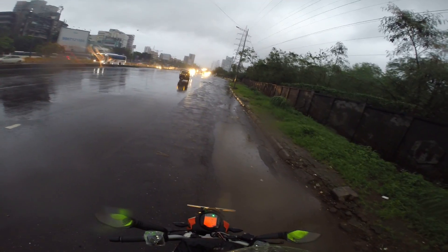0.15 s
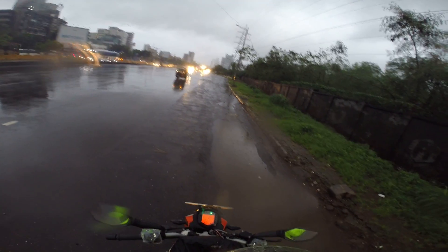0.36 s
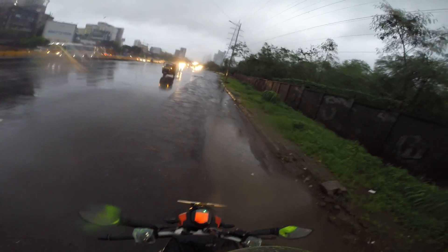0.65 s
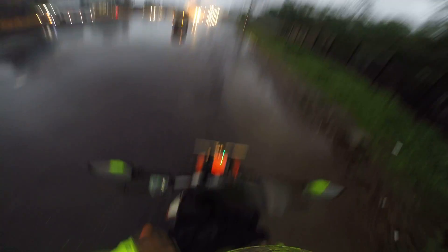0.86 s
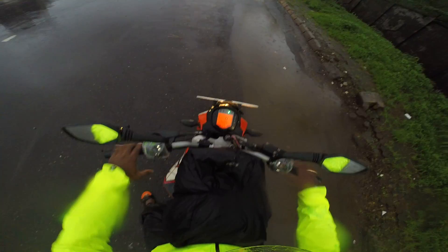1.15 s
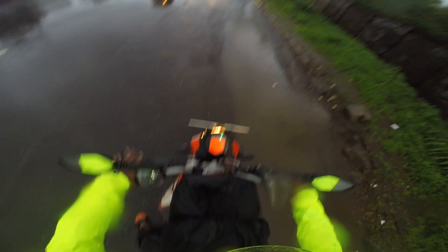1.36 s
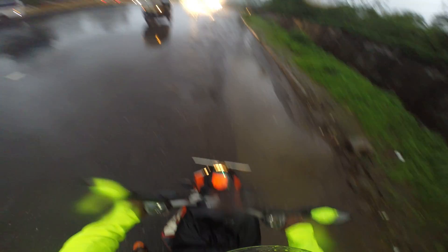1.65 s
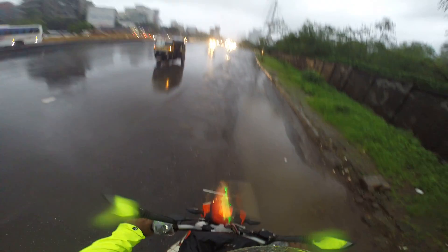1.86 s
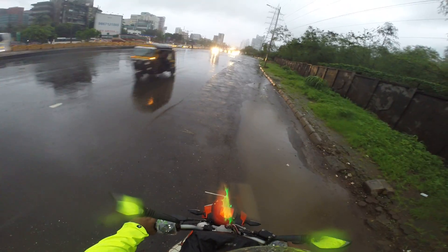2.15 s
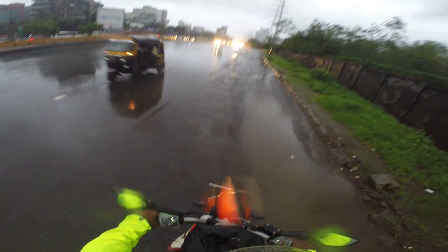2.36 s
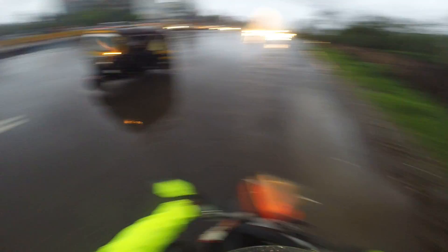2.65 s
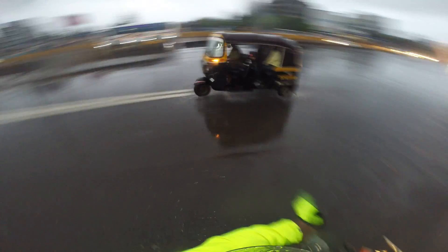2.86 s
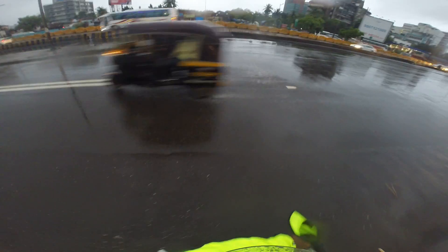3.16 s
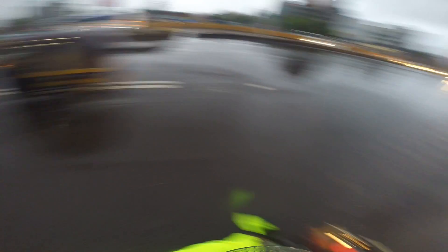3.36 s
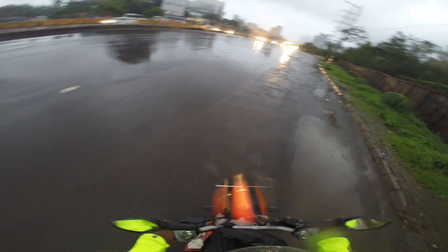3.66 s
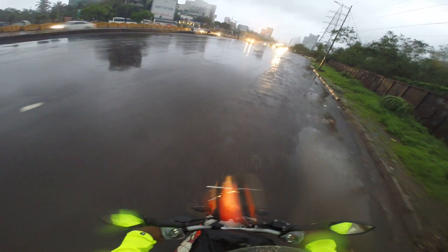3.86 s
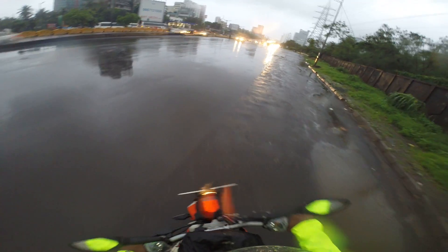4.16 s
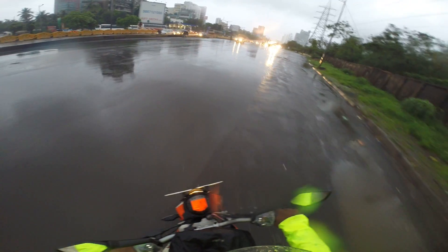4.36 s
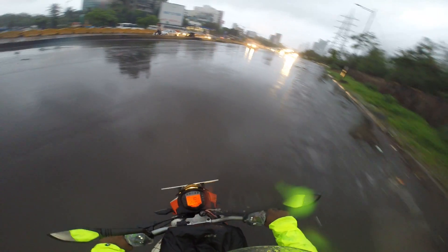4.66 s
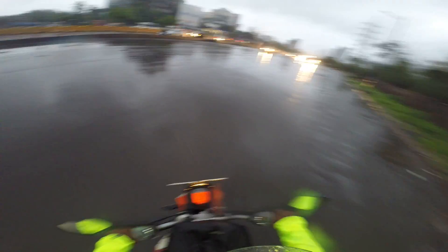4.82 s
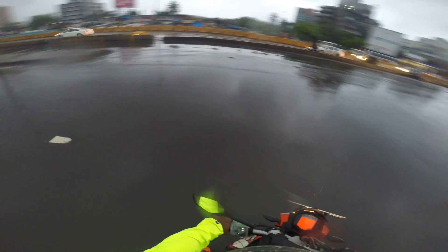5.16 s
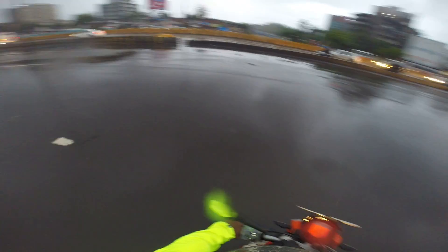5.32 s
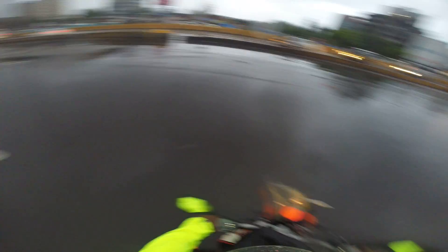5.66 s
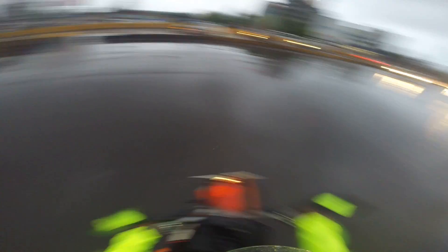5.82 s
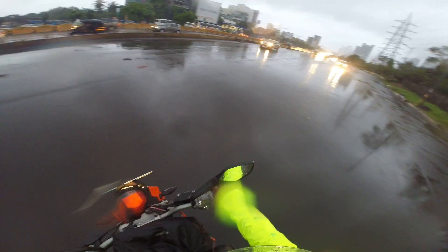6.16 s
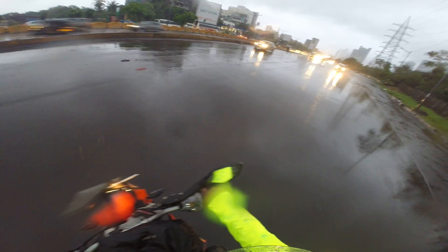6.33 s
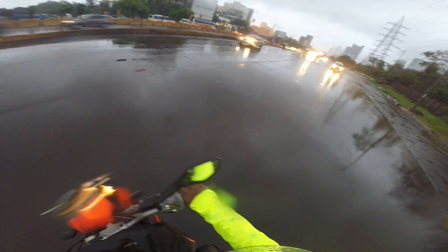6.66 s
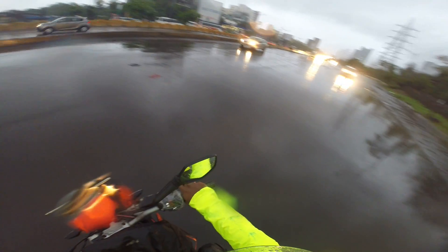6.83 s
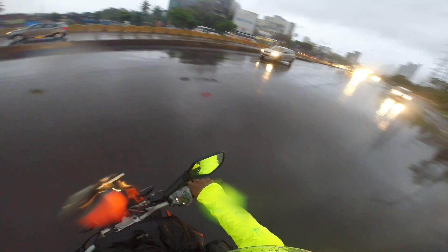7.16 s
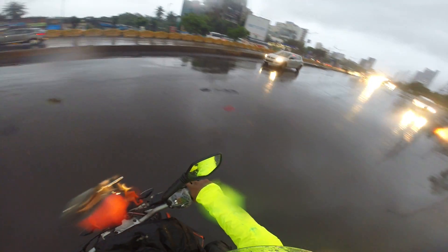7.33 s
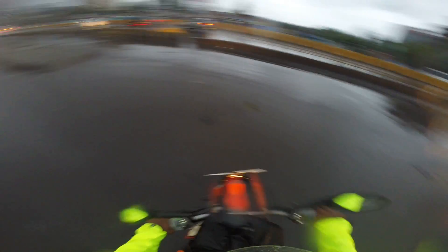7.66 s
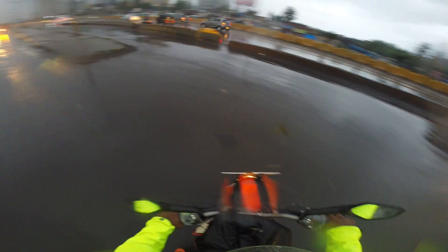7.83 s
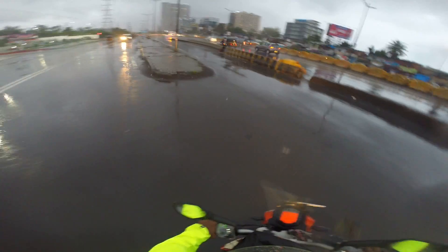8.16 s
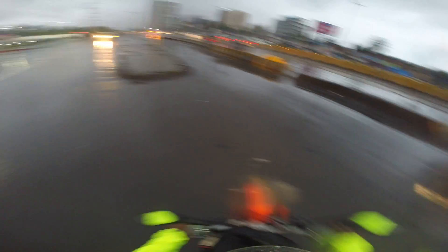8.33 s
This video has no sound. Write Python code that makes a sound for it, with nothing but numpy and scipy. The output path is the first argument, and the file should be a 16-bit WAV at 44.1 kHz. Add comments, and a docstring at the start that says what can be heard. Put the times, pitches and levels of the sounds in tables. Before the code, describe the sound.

A single-cylinder motorbike thuds and clatters along a wet road, jolting the camera mount early, as a three-wheeler hisses past and raindrops tick.

```python
"""A single-cylinder motorbike rides slowly along a wet road, heard from a cased camera on the rider's helmet.
Firing pulses thud through exhaust resonances, under crankcase clatter and tyre spray of shaped noise.
A three-wheeler hisses past as a swell of noise, and wavering sine tones squeak in two bursts.
A rough patch jolts the camera mount into damped swaying, knocking and creaking.
Low noise rumbles as wind on the case, and raindrops ring the case or pat the helmet."""
import sys
import numpy as np
from scipy import signal
from scipy.fft import rfft, irfft, next_fast_len
from scipy.io import wavfile

SR = 44100
rng = np.random.default_rng(int(sys.argv[2]) if len(sys.argv) > 2 else 0)


def put_to_file(sound):
    """Save the sound as 16-bit audio at rate SR, in the file named by the first command-line argument."""
    columns = np.atleast_2d(sound).T  # one column per channel
    safe = np.clip(columns, -1, 1)
    whole_steps = np.round(safe * 32767)
    wavfile.write(sys.argv[1], SR, whole_steps.astype(np.int16))


N = 374409
TIME = np.arange(N) / SR


def undb(db):
    """Decibels to amplitude gain."""
    return 10 ** (np.asarray(db) / 20)


def unit(x):
    """Normalise to an rms of 1."""
    return x / np.sqrt(np.mean(x ** 2))


def curve(table, column=1):
    """Linear interpolation: one column of a table, timed by its first, at every sample."""
    rows = np.array(table)
    return np.interp(TIME, rows[:, 0], rows[:, column])


def held(start_s, end_s, ramp_s):
    """Trapezoidal envelope: rises from 0 to 1 around the start, holds, and falls around the end."""
    nearest_edge_s = np.minimum(TIME - start_s, end_s - TIME)
    return np.clip(nearest_edge_s / ramp_s + .5, 0, 1)


def colour(x, points):
    """Spectral shaping: filter by (Hz, dB) points joined along log frequency; rms 1."""
    hz, db = np.transpose(points)
    size = next_fast_len(N)
    bins_hz = np.maximum(np.fft.rfftfreq(size, 1 / SR), 1)
    gain = undb(np.interp(np.log(bins_hz), np.log(hz), db))
    return unit(irfft(rfft(x, size) * gain, size)[:N])


def ring(modes, length_s):
    """Modal superposition: impulse response of damped resonances (Hz, width Hz, dB)."""
    t = np.arange(int(length_s * SR)) / SR
    response = np.zeros(len(t))
    for hz, width_hz, db in modes:
        decay = np.exp(-np.pi * width_hz * t)
        # scaling by width makes the dB set the height of the resonance peak
        response += undb(db) * width_hz * decay * np.sin(2 * np.pi * hz * t)
    return response


def resonate(x, modes):
    """Convolution: a sound drives damped resonances; rms 1."""
    return unit(signal.fftconvolve(x, ring(modes, .1))[:N])


def walk(rate_hz):
    """Slow modulation: random wandering through new values at a steady rate, with a spread near 1."""
    knots = rng.standard_normal(4096)
    return 1.2 * np.interp(TIME * rate_hz, np.arange(len(knots)), knots)


def patter(rate_hz, spread_db):
    """Shot noise: random tiny impacts, a few bigger than the rest; rms 1."""
    hit = rng.random(N) < rate_hz / SR
    sign = rng.choice([-1, 1], N)
    size_db = spread_db * np.minimum(rng.exponential(size=N), 4)
    return unit(hit * sign * undb(size_db))


def add(out, s, sound):
    """Linear superposition: mix a sound in from a given time."""
    start = max(int(s * SR), 0)
    out[start:start + len(sound)] += sound[:N - start]


# engine speed: time_s, firing_rate_hz
FIRING_RATE = [(0, 24), (2.4, 21), (2.6, 22.5), (2.92, 23.9), (3.5, 29.5), (3.72, 28.9), (4.03, 32.4),
               (4.47, 26.3), (4.7, 27), (4.95, 30.5), (5.2, 26.3), (6.45, 22.9), (6.78, 27), (7.28, 24.1),
               (7.48, 28.4), (7.7, 29.8), (8, 29.7), (8.3, 31)]
# pulls on the throttle: opens_s, closes_s, exhaust_over_idle_db
THROTTLE_PULLS = [(2.558, 3.927, 6.5), (3.917, 4.415, 3), (4.428, 5.0, 6.5), (5.82, 5.98, 4),
                  (6.422, 8.6, 5.5)]
# engine clatter: time_s, relative_level_db
CLATTER_LEVEL = [(1.0, -51), (1.29, -51), (2.08, -47.5), (2.31, -50), (2.71, -45.5), (3.25, -49.5),
                 (3.9, -46), (4.23, -48.5), (4.88, -49.5), (5.17, -53.5), (5.75, -52.5), (6.28, -48),
                 (6.84, -51), (8.49, -50)]
# exhaust resonances of one silencer chamber: pitch_hz, width_hz, peak_db
EXHAUST_MODES = [(59, 16, -6), (164, 50, 0), (285, 60, -14), (365, 80, -8), (425, 60, -10)]
# crankcase resonances: pitch_hz, width_hz, peak_db
CRANKCASE_MODES = [(1450, 220, -24.5), (1738, 114, -9), (1843, 130, -13.5), (2220, 240, -14.5),
                   (2530, 180, -17), (2700, 84, -19)]


def engine(idle_db=-59.0, uneven_db=0.8, ramp_s=0.071, clatter_db=1, tick_share=0.16, tick_length=0.18):
    """Pulse excitation: firings thump the exhaust; valve gear and piston rattle the case twice per firing."""
    cycles = np.cumsum(curve(FIRING_RATE)) / SR
    strength = undb(.8 * rng.standard_normal(N))
    firings = np.diff(np.floor(cycles), prepend=0) * strength
    # two silencer chambers in a row keep only the low thud
    exhaust = resonate(resonate(firings, EXHAUST_MODES), EXHAUST_MODES)
    exhaust = colour(exhaust, [(20, -12), (50, 0), (450, 0), (1000, -4), (3000, -30)])
    # an open throttle makes each thump harder
    load_db = sum(db * held(opens_s, closes_s, ramp_s) for opens_s, closes_s, db in THROTTLE_PULLS)
    exhaust_db = idle_db + load_db + uneven_db * walk(7)

    ticks = np.exp(-(2 * cycles % 1) / tick_length)  # length in half firing periods
    friction = rng.standard_normal(N) * (1 - tick_share + 2 * tick_share * ticks)
    rattle = resonate(friction, CRANKCASE_MODES)
    # a small stiff casing radiates little bass
    rattle = colour(rattle, [(100, -45), (700, -20), (1150, -14), (1400, 0), (3000, 0), (4500, -12)])
    rattle_db = curve(CLATTER_LEVEL) + clatter_db + .5 * walk(10)
    return exhaust * undb(exhaust_db) + rattle * undb(rattle_db)


# tyre spray, one list along the kerb and one across the road: time_s, relative_level_db
SPRAY_FLOW = [
    [(0.0, -53.5), (0.936, -55.5), (1.112, -52), (1.8, -51.5)],
    [(3.9, -51.5), (5.06, -52.5), (6.44, -50.5), (7.93, -47), (8.17, -48), (8.49, -48)],
]
# spectrum of the coarse droplets: frequency_hz, density_db
HISS_COLOUR = [(100, 4), (700, -2), (1100, -3), (2200, -3), (2850, 3.5), (3500, -2), (4100, 1), (4700, -3),
               (5600, 1.5), (7000, -3), (7480, 0.5), (8300, -14.5), (10000, -20), (15000, -37)]
# spectrum of the fine droplets: frequency_hz, density_db
FINE_MIST_COLOUR = [(4000, -28), (6500, 2), (8400, -3), (8900, -1.5), (9700, -8.5), (10600, -5.5),
                    (11100, -9), (11800, -7.5), (13000, -14.5), (15500, -25)]


def spray(hiss_db=-48, mist_db=-60, mist_growth=1.3, flutter_db=0.95):
    """Broadband droplet noise: the fine mist grows faster with the flow than the coarse hiss."""
    flow_db = curve(np.concatenate(SPRAY_FLOW))
    flow_db = flow_db - flow_db.mean()
    hiss = colour(rng.standard_normal(N) + .5 * patter(6000, 0.72), HISS_COLOUR)
    mist = colour(rng.standard_normal(N) + .5 * patter(2800, 2), FINE_MIST_COLOUR)
    droplets = hiss * undb(hiss_db + flow_db) + mist * undb(mist_db + mist_growth * flow_db)
    return droplets * undb(flutter_db * walk(14))


# the three-wheeler is alongside at this time, at this distance and relative speed
PASS_S, PASS_GAP_M, PASS_SPEED_M_S = 2.96, 3.9, 8.2
# the rider turns to look at it
LOOK_FROM_S, LOOK_UNTIL_S, HEAD_TURN_S = 2.81, 3.45, .16
# spectrum while the rider faces it: frequency_hz, density_db
FACING_COLOUR = [(200, -38), (1000, -11), (2000, -8), (2800, 1), (3500, -2.5), (4400, 2.5), (4900, -1.5),
                 (5500, 4), (6500, -1), (7300, -12), (8200, -12), (9200, -17), (14000, -31)]
# spectrum while the rider looks ahead: frequency_hz, density_db
LOOKING_AHEAD_COLOUR = [(200, -40), (1000, -12), (2000, -8), (2800, -6), (3400, -5), (3900, 5), (4350, 2),
                        (4800, -7.5), (5600, 3.5), (6200, -19), (7600, -5), (9000, -23.5), (14000, -26.5)]


def three_wheeler(passing_db=-42.0, beam=1.06, shadow_db_per_s=30):
    """Distance law and directivity: spray peaks alongside, changes colour as the head turns, then fades."""
    distance_m = np.hypot(PASS_GAP_M, PASS_SPEED_M_S * (TIME - PASS_S))
    closeness = PASS_GAP_M / distance_m
    facing = held(LOOK_FROM_S, LOOK_UNTIL_S, HEAD_TURN_S)
    noise = rng.standard_normal(N)
    wash = (1 - facing) * colour(noise, LOOKING_AHEAD_COLOUR) + facing * colour(noise, FACING_COLOUR)
    # the helmet shadows the sound once it is behind
    behind_s = np.maximum(TIME - LOOK_UNTIL_S, 0)
    # the wheels throw their spray sideways, so it falls off faster than with distance alone
    return wash * closeness ** (1 + beam) * undb(passing_db - shadow_db_per_s * behind_s)


# squeaks: start_s, length_s, start_pitch_hz, end_pitch_hz, level_db
SQUEAK_GLIDES = [(5.36, 0.087, 4115, 4045, -47.5), (5.363, 0.14, 3345, 3250, -52),
                 (5.505, 0.18, 4070, 4030, -55.5), (5.512, 0.1, 3320, 3325, -47.5)]


def squeaks(waver=0.0024, rough_db=2):
    """Frequency modulation: thin wavering sine squeals, as of a wet brake."""
    out = np.zeros(N)
    for s, length_s, start_hz, end_hz, db in SQUEAK_GLIDES:
        n = int(length_s * SR)
        hz = np.linspace(start_hz, end_hz, n) * (1 + waver * walk(130)[:n])
        swell = signal.windows.tukey(n, .7) * undb(db + rough_db * walk(103)[:n])
        add(out, s, np.sqrt(2) * swell * np.sin(2 * np.pi * np.cumsum(hz) / SR))
    return out


# jolts of the camera mount: start_s, sway_peak_db, knock_peak_db
MOUNT_JOLTS = [(0.002, -29, -32.5), (0.164, -18.5, -29), (0.219, -39, -27.5), (0.477, -6, -38),
               (0.574, -33, -11.5), (0.608, -21.5, -35), (0.636, -26, -16), (0.652, -17.5, -18),
               (0.751, -21, -13), (0.766, -10.5, -16.5), (0.797, -18.5, -20.5), (0.847, -26, -36),
               (2.715, -35, -40)]
# resonances of the mount's joint: pitch_hz, width_hz, peak_db
MOUNT_MODES = [(59, 17, 11.5), (84, 20, 4), (113, 33, -6), (197, 19, -11), (271, 16, -7), (305, 48, -29)]
# slips of the creaking joint: start_s, level_db
CREAK_SLIPS = [(0.603, -31), (0.627, -30), (0.64, -24), (0.655, -25.5), (0.680, -36), (0.751, -37.5)]
# spectrum of the creak: frequency_hz, density_db
JOINT_COLOUR = [(150, 5), (300, -3.5), (500, -11), (720, -16.5), (920, -8), (1150, -18), (1500, 1.5),
                (1750, 2), (2000, -7), (2600, -15.5), (4000, -32), (8000, -49)]


def mount(sway_hz=39, sway_decay_s=.045, rise_s=0.0065, knock_rise_s=0.0063, slip_s=0.0029):
    """Damped oscillation and stick-slip: jolts sway the camera and knock its joint, which creaks in slips."""
    out, t = np.zeros(N), np.arange(SR // 2) / SR
    sway = -np.sin(2 * np.pi * sway_hz * t) * np.exp(-t / sway_decay_s) * (1 - np.exp(-t / rise_s))
    sway = sway / np.abs(sway).max()
    knock = -ring(MOUNT_MODES, .5) * (1 - np.exp(-t / knock_rise_s))
    knock = knock / np.abs(knock).max()
    for s, sway_db, knock_db in MOUNT_JOLTS:
        add(out, s, undb(sway_db) * sway + undb(knock_db) * knock)

    slip = t / slip_s * np.exp(1 - t / slip_s)  # peaks at 1 after slip_s
    slipping = np.zeros(N)
    for s, db in CREAK_SLIPS:
        add(slipping, s, undb(db) * slip)
    return out + slipping * colour(patter(2800, 0.79), JOINT_COLOUR)


# gusts of wind on the case: peak_s, length_s, over_steady_airflow_db
WIND_GUSTS = [(0.696, 1.44, 8), (1.95, 0.57, 5.5), (2.773, 0.24, 10.5), (3.197, 0.3, 4.5), (3.707, 1, 6.5),
              (6.144, 0.32, 5.5), (6.75, 0.74, 3.5), (7.7, .3, 4.5)]
# spectrum of the wind rumble: frequency_hz, density_db
RUMBLE_COLOUR = [(10, -14.5), (25, 0), (38, -0.5), (60, -10.5), (90, -12.5), (150, -18.5), (300, -20.5),
                 (800, -31), (4000, -52)]


def wind(wind_db=-53, eddy_db=1.15):
    """Turbulent pressure noise: eddies rumble on the case; each gust swells and dies away evenly."""
    swell_db = sum(db * np.exp(-(2 * (TIME - s) / length_s) ** 2) for s, length_s, db in WIND_GUSTS)
    rumble = colour(rng.standard_normal(N), RUMBLE_COLOUR)
    return rumble * undb(wind_db + swell_db + eddy_db * walk(10))


# resonances of the case, before each drop's own emphasis: pitch_hz, width_hz, peak_db
CASE_MODES = [(1480, 234, -0.5), (1720, 99, 0), (2525, 142, 7.5), (2756, 110, 3.5), (3222, 146, 4),
              (4310, 850, -3.5), (5490, 130, 4.5), (6430, 230, 0.5), (7930, 310, -5), (9640, 260, -9.5),
              (12000, 410, -19)]


def tap(treble_db, low_db, struck_hz, boost_db=4, skirt=1.02, shell_hz=1150,
        lag_s=0.000668, lag_hz=2700, lag_width_hz=1500, size=2048):
    """Modal excitation: a drop briefly rings the case; where it lands decides which modes lead. Peak 1."""
    hz, width_hz, db = np.transpose(CASE_MODES)
    db = db + treble_db * (hz > 4000) + low_db * (hz < 2000)
    db = db + boost_db * np.exp(-((hz - struck_hz) / 200) ** 2)
    f = np.fft.rfftfreq(size, 1 / SR) + 1
    peaks = undb(db) ** 2 / (1 + (2 * (f[:, None] - hz) / width_hz) ** 2) ** skirt
    power = np.sum(peaks, axis=1)
    # roll off the bass below shell_hz and the extreme treble
    power = power / (1 + (shell_hz / f) ** 4) / (1 + (f / 13000) ** 24)
    # folding the cepstrum makes the ring follow the blow (minimum phase)
    cepstrum = irfft(np.log(power))[:size // 2]
    # the slow bending waves of the wall arrive just after the first tick
    delay_s = lag_s * np.exp(-((f - lag_hz) / lag_width_hz) ** 2)
    lag_phase = 2 * np.pi * np.cumsum(delay_s) * SR / size
    sound = irfft(np.exp(rfft(cepstrum, size) - 1j * lag_phase))[:size // 2]
    return sound / np.abs(sound).max()


def splat(hz, splash_s=0.003, width_hz=1000):
    """Band-limited burst: a drop spreads over the helmet shell as short, dull noise; peak 1."""
    t = np.arange(SR // 50) / SR
    burst = rng.standard_normal(len(t)) * np.exp(-t / splash_s)
    band_hz = [hz - width_hz / 2, hz + width_hz / 2]
    sound = signal.sosfilt(signal.butter(2, band_hz, "band", fs=SR, output="sos"), burst)
    return sound / np.abs(sound).max()


# dull raindrops on the helmet: start_s, peak_db, pitch_hz
HELMET_PATS = [(1.1366, -31, 2320), (1.7163, -30, 2350), (4.627, -33, 2040), (4.6830, -28.5, 1960),
               (5.1505, -31, 1600), (5.799, -31, 2260), (5.946, -26, 1880), (6.5096, -30, 1780),
               (6.6566, -30.5, 2000), (6.7337, -30, 1850), (7.0813, -30, 1830), (7.7336, -28, 1840),
               (7.897, -28.5, 2250)]
# sharp raindrops on the case: start_s, peak_db, treble_db, low_ring_db, most_strongly_struck_hz
CASE_DROPS = [(0.4729, -11.5, -11, -1, 3380), (3.9651, -7.5, -4, 1, 2740), (5.3950, -6.5, -2.5, 4, 3350),
              (5.5770, -14, -8, 1.5, 2660), (7.3048, -10.5, -12.5, 0.5, 2770),
              (7.6260, -6, -6.5, -1.5, 2550), (7.6322, -13, -5, -2, 3340)]


def rain(drizzle_db=-57):
    """Impact noise: big drops click on the case and pat on the helmet, over a faint patter of small ones."""
    small = colour(patter(40, 2.5), [(500, -30), (1100, -12), (1700, 0), (2600, -2), (4000, -18), (10000, -36)])
    out = small * undb(drizzle_db)
    for s, db, hz in HELMET_PATS:
        add(out, s, undb(db) * splat(hz))
    for s, db, treble_db, low_db, struck_hz in CASE_DROPS:
        add(out, s, undb(db) * tap(treble_db, low_db, struck_hz))
    return out


def scene():
    """Superposition: every source sums at one microphone."""
    mix = engine() + spray() + three_wheeler() + squeaks() + mount() + wind() + rain()
    return mix[None]


def record(dry, top_hz=15400):
    """Low-pass filtering: the camera steeply cuts the top of the spectrum."""
    return signal.sosfilt(signal.ellip(10, .1, 80, top_hz, fs=SR, output="sos"), dry)


dry = scene()
out = record(dry)
put_to_file(out)
```